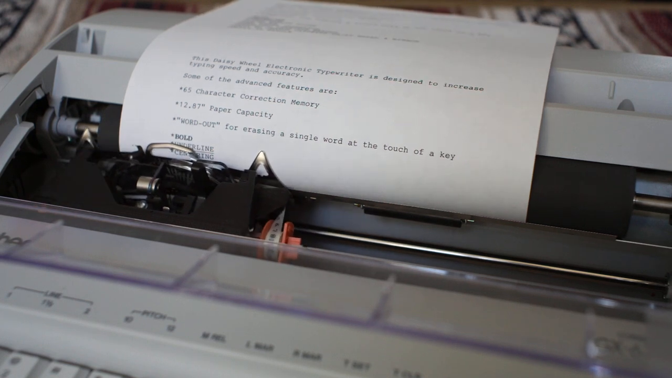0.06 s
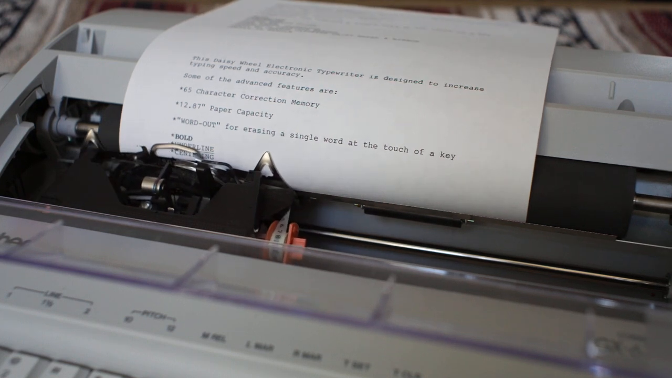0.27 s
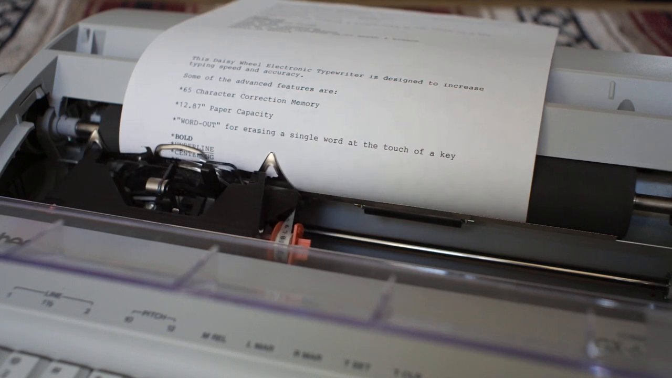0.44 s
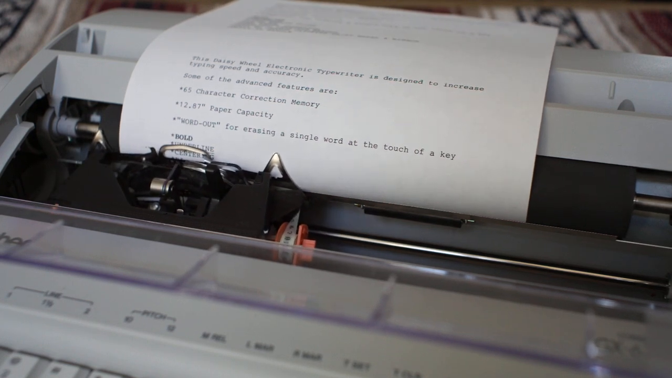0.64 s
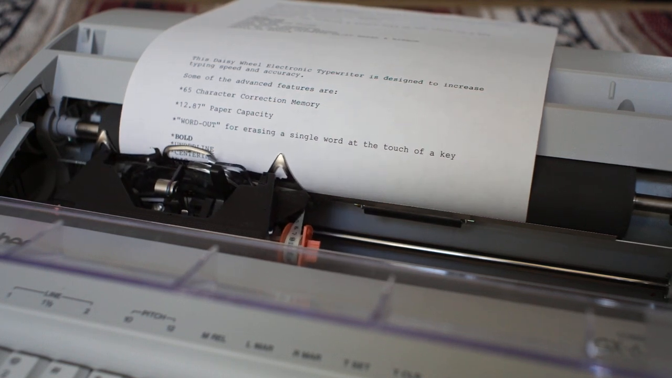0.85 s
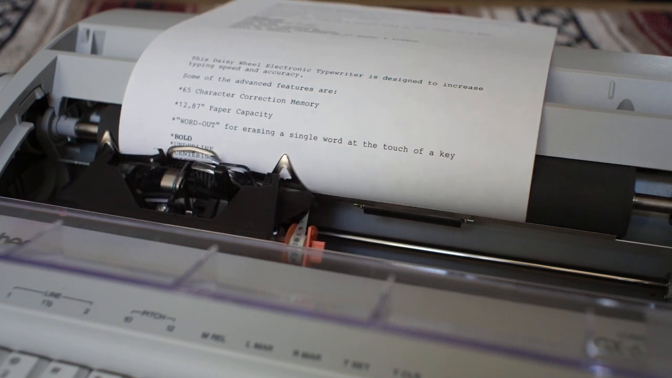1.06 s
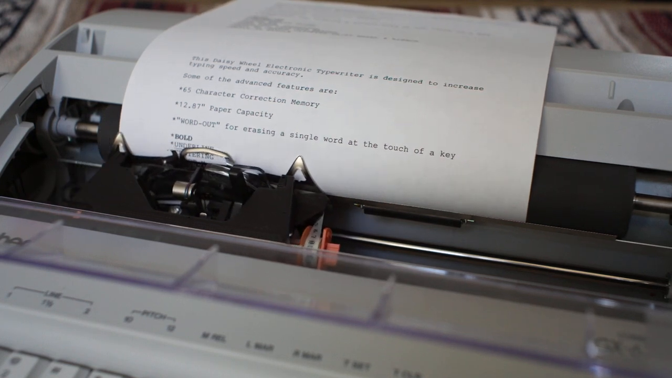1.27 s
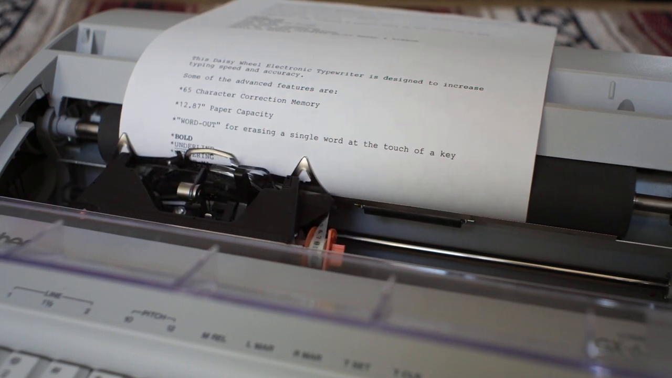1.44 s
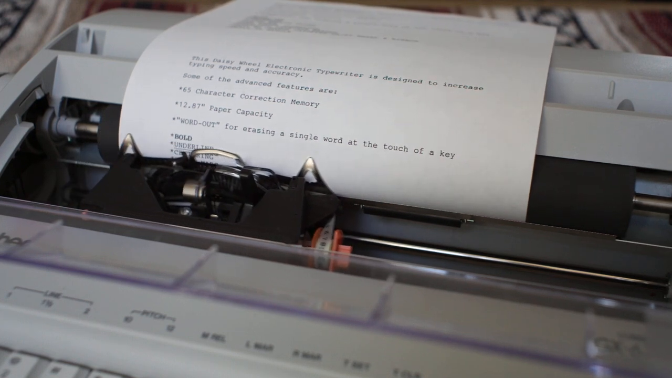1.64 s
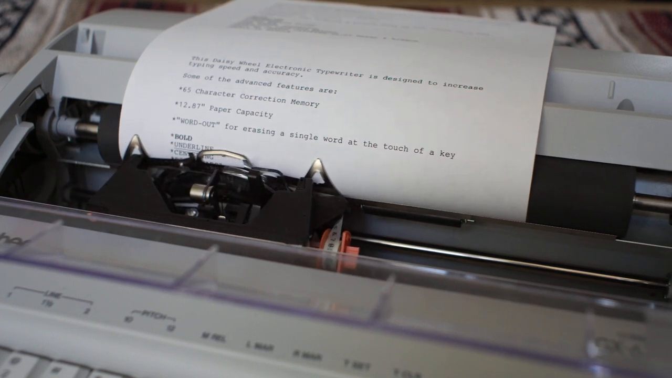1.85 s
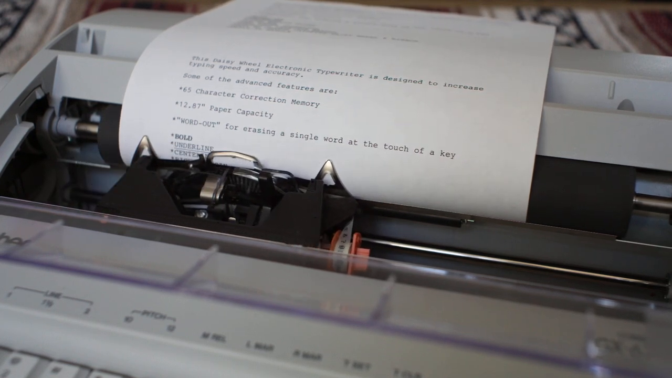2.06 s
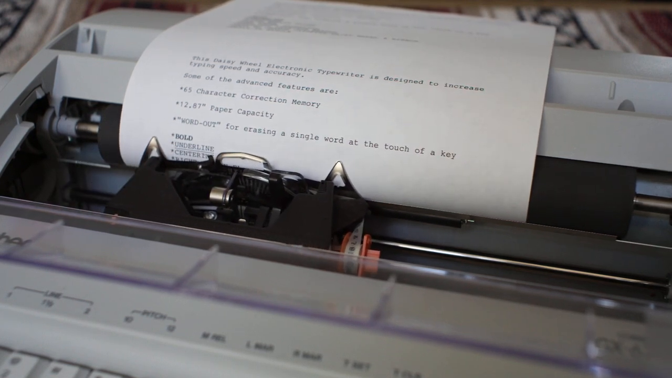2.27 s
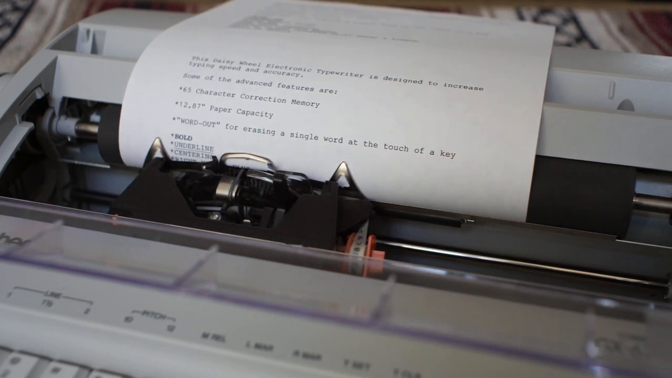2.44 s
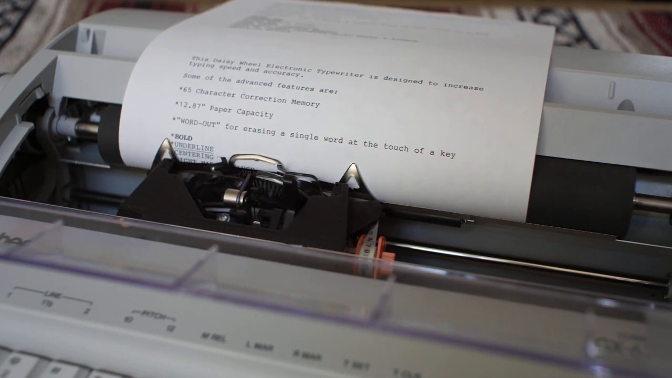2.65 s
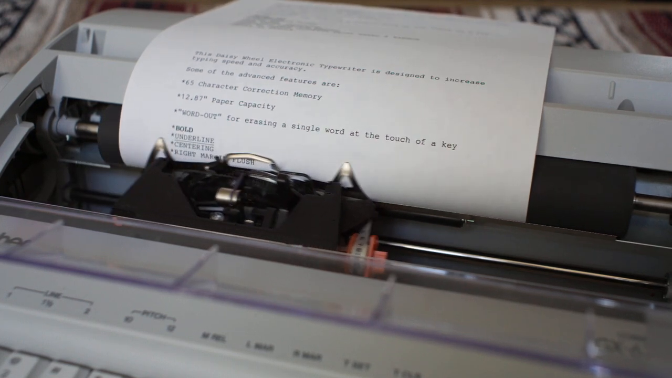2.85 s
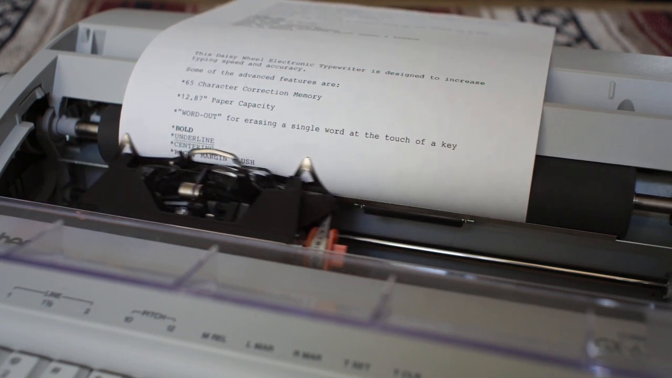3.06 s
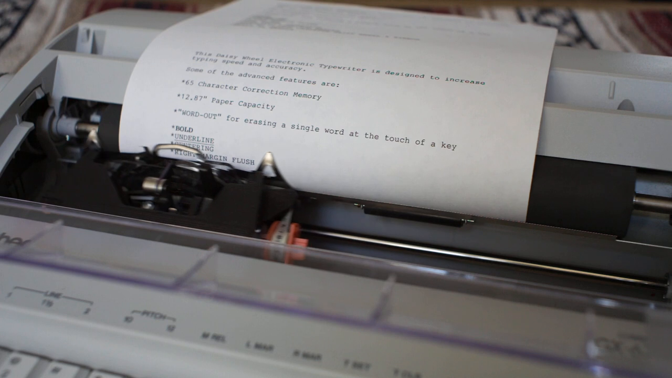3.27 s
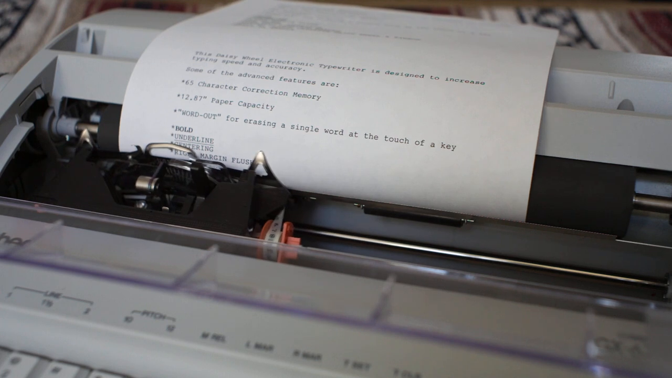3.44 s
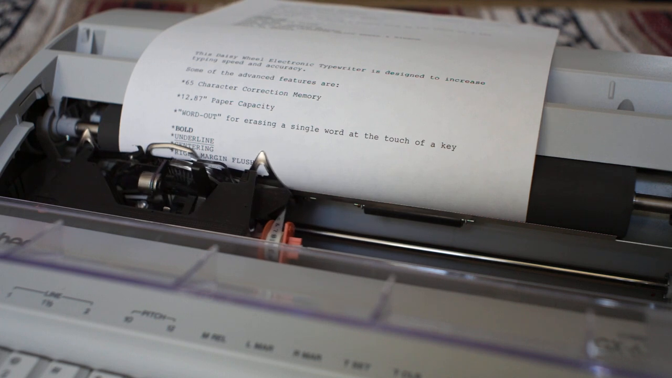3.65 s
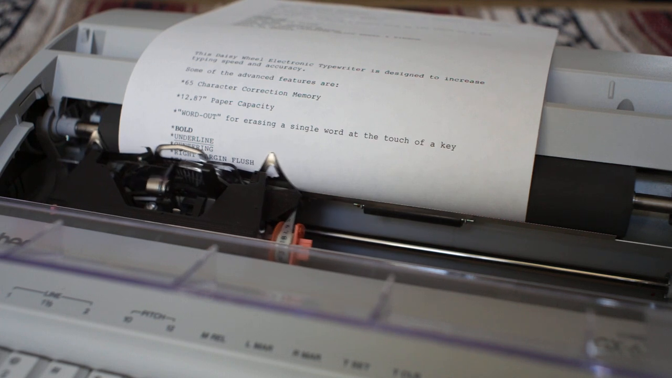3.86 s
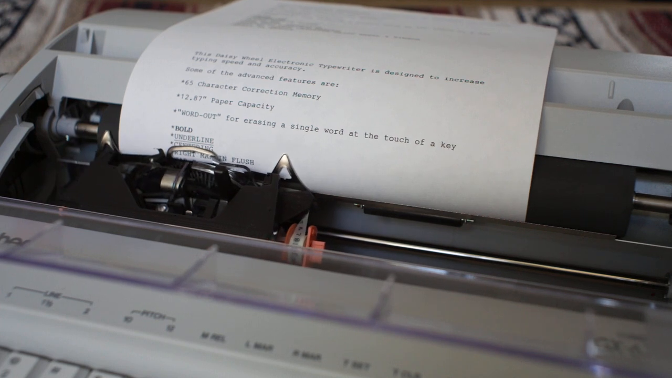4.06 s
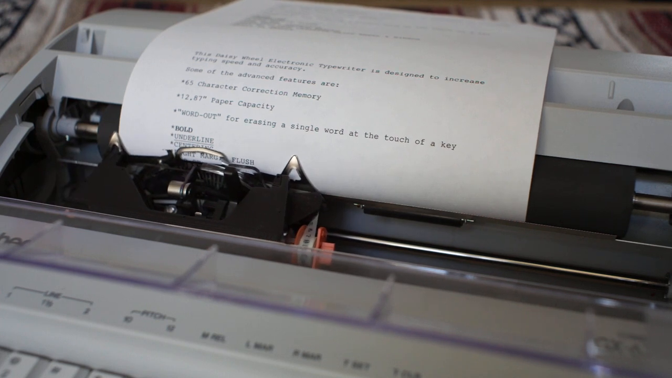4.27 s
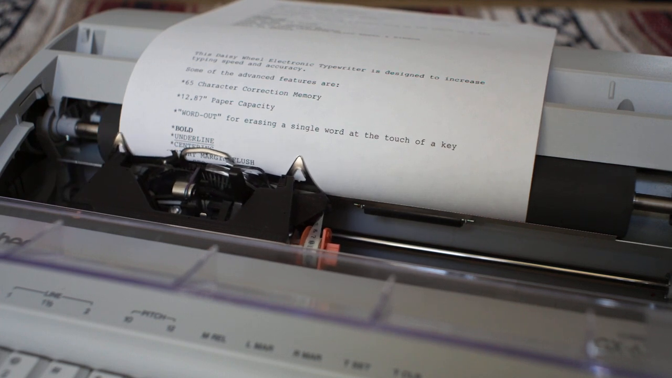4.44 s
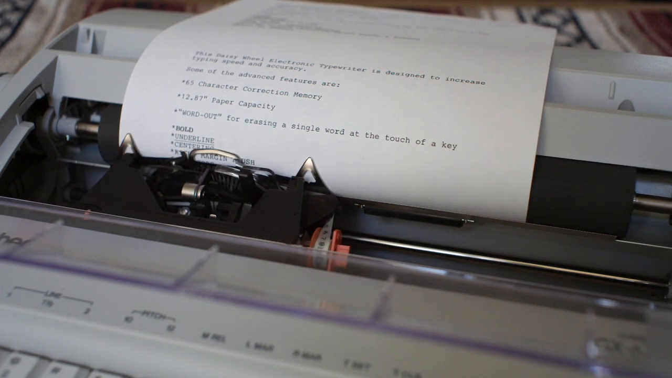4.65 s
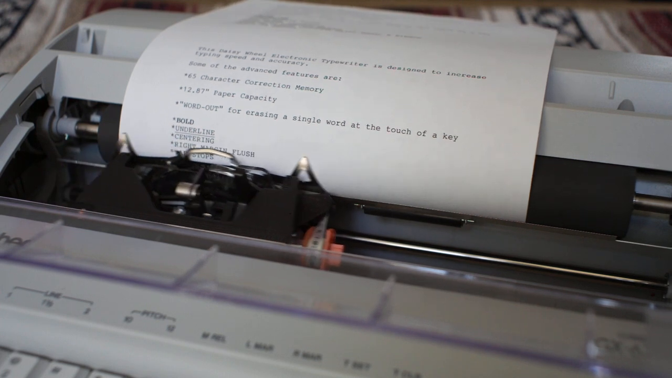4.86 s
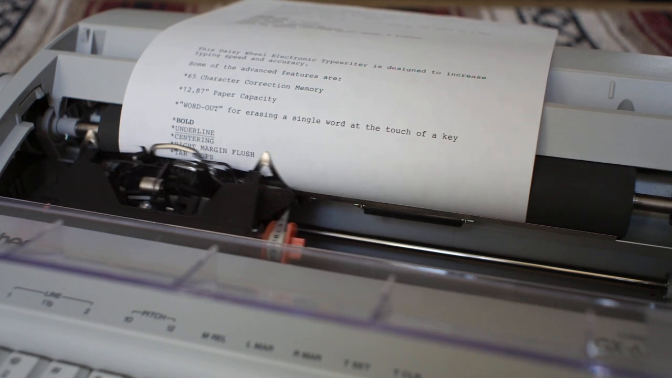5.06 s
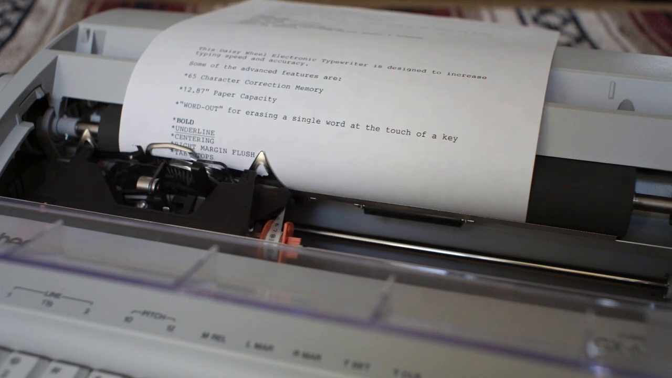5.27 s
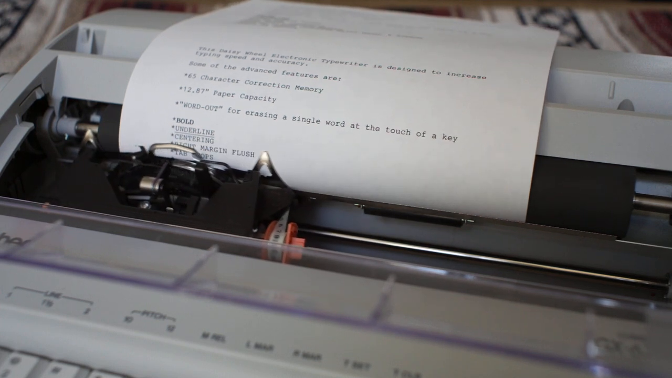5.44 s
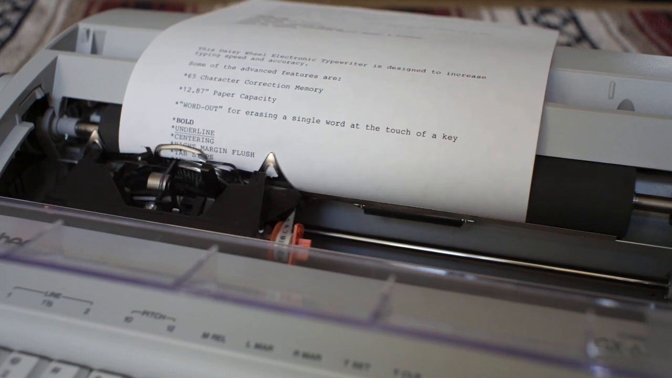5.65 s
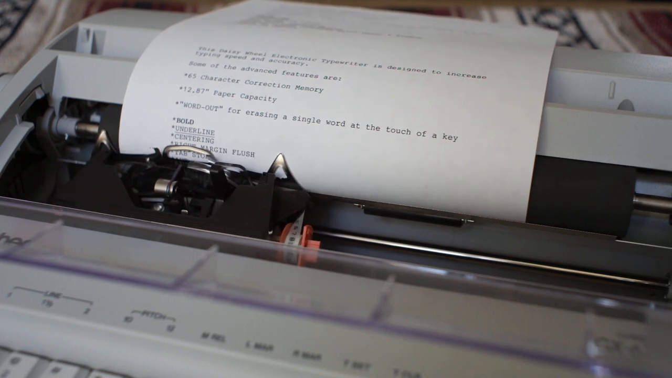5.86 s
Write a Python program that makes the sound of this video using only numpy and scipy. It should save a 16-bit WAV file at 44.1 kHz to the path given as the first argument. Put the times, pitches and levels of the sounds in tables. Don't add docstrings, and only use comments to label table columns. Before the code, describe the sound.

Close, dry machine-gun-like typing from a daisy wheel typewriter: a long run, a humming carriage return, a shorter run, another hum, four final clacks.

```python
import sys
import numpy as np
from scipy import signal
from scipy.fft import rfft, irfft
from scipy.io import wavfile
from scipy.ndimage import uniform_filter1d, map_coordinates

SR = 44100
rng = np.random.default_rng(int(sys.argv[2]) if len(sys.argv) > 2 else 0)


def wav_record(signal):
    frames = np.transpose(np.atleast_2d(signal))
    bounded = np.clip(frames, -1, 1)
    quanta = np.round(bounded * 32767).astype(np.int16)
    wavfile.write(sys.argv[1], SR, quanta)


def voltage_ratio(decibels):
    exponent = np.asarray(decibels, float) / 20
    return 10 ** exponent


N = 260631

# blow [t/s], blow [level/dB], rebound [level/dB], brightness re blow [level/dB]
LETTERS = [(0.2685, -32.5, -35.5, -5), (0.4477, -29, -35.5, -4.5), (0.656, -32.5, -38, -4.5),
           (0.8431, -29.5, -36.5, -5.5), (1.017, -31, -36, -6.5), (1.1382, -29, -35, -7),
           (1.2874, -30.5, -37, -7.5), (1.443, -28.5, -35.5, -7), (1.5981, -30, -37, -6),
           (1.7032, -29.5, -34.5, -5), (1.8893, -30.5, -34.5, -8.5), (1.989, -30, -35.5, -5),
           (2.1555, -31, -37, -6.5), (2.271, -29.5, -37, -5), (2.3948, -30, -34.5, -7),
           (2.515, -29, -35.5, -5), (2.6262, -31.5, -35, -6), (3.7142, -30, -34.5, -4.5),
           (3.8136, -31, -35.5, -5), (3.913, -30.5, -36, -4.5), (4.0117, -32, -34.5, -5.5),
           (4.1405, -29, -34.5, -7.5), (4.239, -32, -36, -7), (4.383, -29.5, -34.5, -6),
           (4.537, -29.5, -35, -9), (4.637, -29.5, -35, -5.5), (5.4824, -33, -34, -5),
           (5.587, -29.5, -36.5, -5.5), (5.718, -32, -35, -4), (5.8463, -28.5, -37, -7)]
# near 700 Hz, 1.8 kHz, 3.6 kHz [level/dB each]
LETTER_TINTS = [(-1.5, 0.5, -0.5), (-2, -2.5, 0.0), (0, 0.5, 0.0), (1.5, -2.5, 1.0), (0, -1.5, 1),
                (-2.5, 0.5, -0.5), (0.5, 0.5, 1), (-1, 0.0, 0.5), (2.5, 1, -1.5), (-1.5, 1.5, 0.5),
                (2, -1.5, 0.5), (-1, -0.5, 0.5), (2.5, -0.5, 2), (-0.5, 0.0, 1), (0.5, -2.5, 1), (0.5, 0, -1),
                (-0.5, 0, 0.5), (-1.5, -0.5, 0), (-1.5, -1, -0.5), (-0.5, -1, 1), (-0.5, -1, 0), (-2.5, 0, 0),
                (-0.5, -1.5, 2.5), (-3, 1.5, 0.5), (1, -2, 1), (-2, 0, 0.5), (-1.5, 1, -2), (-2, -1, -0.5),
                (-1.5, -0.5, 0.5), (-3.0, 0.5, 0)]
# low edge [f/Hz], high edge [f/Hz]
TINT_BANDS_HZ = [(450, 1100), (1300, 2600), (2600, 5000)]

# time re blow (PULL: re pull) [t/ms], [level/dB], rise [t/ms], t60 [t/ms]
PULL = [
    (0, 1, 0.65, 23.7),
    (2.5, -3, 3.5, 33),
]
TICKS = [
    (-25, -11.5, .4, 27),
    (-19.3, -15.5, 1, 26),
    (-11.6, -12.5, .3, 16),
]
TRAVEL = [
    (-23.5, -24, 1.5, 26),
    (-18.5, -23, 1, 25),
    (-10.5, -22, 1, 30),
]
TEETH = [
    (-46.5, -32, 0.88, 40),
    (18.5, -25, .6, 16),
    (24.5, -23.5, 0.54, 17),
    (29.5, -30, .6, 11),
    (35.5, -22.5, 0.94, 16),
    (42.5, -27, .6, 18),
    (57, -26.5, .6, 19),
]
BLOW = [
    (0.1, -3, 0.24, 13),
    (0.1, 4.5, 0.92, 15.9),
    (3.99, -8, 1, 13),
]
REBOUND = [
    (6.5, 2.5, 0.35, 20.4),
    (8.2, 0.5, 0.64, 18.4),
    (12, -2, 0.91, 7.6),
    (16.5, -46, 1.1, 33),
]
STOP = [
    (55.6, -25.5, 3.9, 43),
    (64.2, -30.5, 2.8, 60),
]
# time re blow [t/ms], [level/dB], the same for every letter
STEP = [(8, -53.5), (14, -18.5), (22, -22.5), (30, -27.5), (45, -28.5), (60, -32.5), (70, -37.5), (78, -40),
        (110, -61)]

# [f/Hz], [level/dB]
PULL_TONE = [(88, -66), (150, -24.5), (960, -2.5), (1420, -3), (2060, 1), (2600, -8.5), (3350, 1.5),
             (4670, -6.5), (6510, -2), (7320, -8.5), (8400, -3.5), (11300, -7), (13400, -22), (16000, -26)]
TICK_TONE = [(180, -46), (400, -7.5), (1100, -10), (2100, -4), (3500, -8), (4400, -1.5), (6500, -7),
             (8000, -3), (9300, -1.5), (12000, -7.5), (13500, -16), (15200, -14), (16000, -25)]
BLOW_TONE = [(88, -38.5), (150, -22.5), (783, -12), (1310, -15), (1820, -8), (2350, 0.5), (2810, -1),
             (5170, -7.5), (5700, -10), (6550, -10.5), (7220, -18.5), (9510, -9.5), (11600, -17),
             (15000, -36.5), (16500, -67)]
REBOUND_TONE = [(88, -42), (150, -23), (1070, -2.5), (1590, 0.5), (2350, -2.5), (2920, -1.5), (4600, -4.5),
                (5590, -5.5), (6550, -7.5), (8290, -3.5), (8970, 3), (11600, -6), (13600, -17.5),
                (15300, -16.5), (16500, -42)]
STEP_TONE = [(59, -37.5), (100, -4.5), (153, -9), (676, -3), (836, -2), (1280, -6), (1650, -4.5),
             (1800, -6), (2520, -6.5), (3400, -9), (4570, -8), (6020, -12), (9210, -12), (11400, -46),
             (16000, -54)]
CLUNK_TONE = [(59, -29), (100, 0.5), (1170, 5), (1950, -5.5), (2320, -0.5), (2630, -6.5), (3540, -16),
              (4200, -25), (4870, -14), (7450, -17.5), (9020, -29), (9820, -61), (16000, -43)]
LATCH_TONE = [(900, -25), (2100, -5.5), (2500, -6), (3200, -1), (3800, -11.5), (5000, -13), (7000, -26)]
SNAP_TONE = [(400, 5), (2100, -16), (4400, -4), (9300, 0), (11500, -5.5), (13000, -12), (16000, -34)]
# [f/Hz], [level/dB]
DRIVE_TONE = [(200, -3), (600, 5.5), (1400, -11), (2500, -0.5), (3300, -20), (6500, -33), (8100, -8),
              (9000, -13), (14000, -20)]
WHIRR_TONE = [(400, -26), (1100, -6), (1500, 0), (2300, -8), (3500, -9.5), (9000, -38.5)]
WHEEL_HISS_TONE = [(2000, -30), (4500, 0), (8000, -2), (12000, -8), (16000, -20)]
# [f/Hz], [level/dB]
LOW_FLOOR = [(12, -43), (20, -14.5), (38, -19), (54, -8), (70, -9), (108, -11.5), (142, -27), (185, -13.5),
             (240, -13.5), (299, -12), (436, -8.5), (710, -9.5), (1010, -11), (1180, -12), (1680, -12),
             (1840, -13), (2010, -17), (2460, -19), (2630, -20), (4000, -28), (5200, -58), (8800, -120)]
HIGH_FLOOR = [(1500, -31.5), (3000, -2), (4700, -4), (6500, 3), (8000, -12), (9500, -13), (12000, -17),
              (16000, -28)]
# idle [level/dB], added by a letter [level/dB], rise [t/s], t60 [t/s]
LOW_STIR = (-73.5, -62.5, 0.15, 1.5)
HIGH_STIR = (-91, -68, -8.5, 4.5)

# [f/Hz], width [f/Hz], [level/dB]
FRAME = [(814, 440, 0.5), (1180, 110, 0), (1617, 176, 6), (1837, 126, 6.5), (2128, 88, 5.5),
         (2322, 300, 5.5), (2804, 210, 2.5), (3360, 98, 0), (3860, 145, 2), (4510, 110, 2),
         (6670, 380, 3.5), (7300, 270, -3), (9850, 850, -2.5)]
# [f/Hz], [level/dB], t60 [t/s], start re blow [t/ms]
CASE = [(63.1, -50.5, 0.29, 4), (88, -33, 0.1, 6), (74, -46.5, 0.23, 54.5), (180.4, -44, 0.29, 14),
        (299.3, -27.5, 0.07, 3.5), (343.2, -42, 0.27, -1), (436, -31.5, 0.061, 3.5), (556, -22, 0.035, 3.5),
        (858, -12.5, 0.02, 0.56), (1031, -23.5, 0.035, 0)]
# column 0 [f/Hz], [level/dB], column 16 [f/Hz], [level/dB], t60 [t/ms]
SOLENOID = [(1344, -43.5, 1400, -66, 26), (1630, -60, 4000, -71, 25), (1857, -42, 1100, -48, 29.5),
            (2090, -52, 2200, -60, 30), (2450, -59, 2800, -49, 24.4), (2830, -49.5, 2500, -53, 31),
            (3220, -41.5, 3180, -37.5, 21.4), (3660, -54, 3310, -41.5, 22), (4190, -57, 3100, -36.5, 28),
            (5380, -51, 4900, -51, 22), (5600, -68, 5512, -47.5, 22), (6370, -57, 6341, -42.5, 29),
            (6830, -50, 4600, -57, 20)]
HAMMER = [(1496, -37, 1385, -45, 38), (1950, -50, 2020, -39.5, 18), (2340, -34.5, 2227, -41, 15.4),
          (2470, -33.5, 2476, -43, 24), (2890, -29, 2790, -44, 17.2), (3353, -39, 3270, -38.5, 26),
          (3920, -46, 3811, -32.5, 20), (4277, -35.5, 4700, -45, 21.5), (5000, -37, 5300, -39, 16),
          (5050, -37, 4660, -65, 20), (6390, -56, 5600, -25, 8.4)]
RIBBON = [(1480, -58.5, 1200, -55, 20), (2090, -47, 1900, -45.5, 18), (3250, -54, 3800, -53.5, 20),
          (2384, -44.5, 2300, -49.5, 11)]
SWING = [(510, -56, 640, -56, 25), (1170, -47, 930, -51.5, 16), (1580, -48, 1600, -45, 29),
         (2150, -47.5, 2050, -48, 26), (3390, -54.5, 3300, -58, 33), (5800, -56, 6000, -57.5, 39)]
GUIDE = [(9030, -39.5, 8400, -49.5, 10), (9470, -44, 9500, -42, 13), (15000, -56, 14800, -55, 12)]

# start [t/s], stop [t/s], whine at start, halfway, stop [level/dB each]
WHEEL = [
    (.112, 2.8, -74, -74.5, -79),
    (3.6, 4.8, -74, -75, -80),
    (5.385, 5.91, -70.5, -72, -71),
]
# ribbon lift [t/s], halt [t/s], step rate [f/Hz], hum [level/dB], lift [level/dB]
MOVES = [
    (-.6, -0.071, 462, -72, 0),
    (2.904, 3.427, 461, -70, -0.5),
    (4.9138, 5.205, 460, -70, 0),
]
# time re lift or halt [t/ms], dull [level/dB], sharp [level/dB], rise [t/ms], t60 [t/ms]
LIFT = [
    (-6.5, -53.5, -77.5, 4.4, 45),
    (-1.5, -54, -53, 1.3, 42),
    (6, -57.5, -54, 1.2, 37),
    (17, -63.5, -60, 1.1, 75),
]
HALT = [(-14.5, -64, -79, 4, 50), (-3.5, -68, -80, 3.3, 44), (2, -60.5, -73, 0.88, 41),
        (6, -55.5, -83, 1.9, 51), (18.5, -74, -80, 2.2, 35), (64.5, -56, -83, 3.2, 62),
        (75, -56.5, -66, 2.2, 55), (84, -69, -76, 2.2, 41), (94, -65.5, -56, 1.6, 44),
        (105, -56.5, -72, 1.5, 58), (113, -58.5, -78, 2.3, 36)]
# [t/s], dull [level/dB], sharp [level/dB]
KNOCKS = [(0.1208, -74, -90), (0.148, -64.5, -74), (0.325, -55, -80), (2.074, -53, -67), (2.824, -71, -68),
          (3.668, -66, -69.5), (4.872, -67, -72), (5.437, -73, -83), (0.511, -62, -78), (0.714, -61, -76),
          (.723, -57, -76), (.9, -53.5, -78), (.917, -64, -83), (1.083, -53, -76), (1.233, -51, -76),
          (1.509, -56, -76), (1.768, -51, -76), (2.331, -54.5, -78), (2.459, -58, -78), (2.578, -56, -78),
          (4.072, -73, -82), (4.297, -57, -80), (4.458, -65, -80), (4.703, -61, -78), (5.542, -54, -78),
          (5.78, -58, -78)]

# [f/Hz], t60 [t/s]
ROOM = [(100, 0.36), (1000, 0.31), (4000, 0.4), (12000, 0.29)]
# [f/Hz], [level/dB]
SPREAD = [(50, 4), (100, -18.5), (180, -14), (350, -19.5), (800, -12.5), (1300, -22.5), (2500, -31),
          (4000, -17), (5000, -11), (6200, -22), (8000, -34.5), (11000, -35.5), (14000, -9.5), (16500, -15)]
PLACE = [(20, -20), (48, -2), (100, -0.5), (140, -7), (181, 0), (240, -0.5), (320, -0.5), (420, 1),
         (20000, -1)]
OFFSET = [
    [-.00214],
    [.00154],
]

T_S = np.arange(N) / SR
PRE = 2000
ROW_MS = (np.arange(8000) - PRE)[None] / SR * 1000
BLOW_S, BLOW_DB, REBOUND_DB, BRIGHT_DB = np.transpose(LETTERS)
EVEN_DB = np.zeros(len(BLOW_S))
HARD_DB = BLOW_DB - BLOW_DB.mean()
FIRST = np.diff(BLOW_S, prepend=-1) > .5
COLUMN = np.arange(len(FIRST)) - np.maximum.accumulate(FIRST * np.arange(len(FIRST)))
LEAD_MS = 36.2
PULL_LEAD_MS = (LEAD_MS + 0.47 * HARD_DB + 0.724 * FIRST)[:, None]


def unit(x):
    return x / np.sqrt(np.mean(x ** 2) + 1e-20)


def noise():
    return rng.standard_normal(N)


def along(points, hz):
    f, v = np.transpose(points)
    return np.interp(np.log(hz + 1), np.log(f + 1), v)


def wobble(rate_hz):
    knots = rng.standard_normal(int(N * rate_hz / SR) + 4)
    return map_coordinates(knots, [np.arange(N) * rate_hz / SR])


def colour(x, tone, ring=0, size=8192):
    hz = np.fft.rfftfreq(size, 1 / SR)
    bumps_db = sum(db / (1 + (2 * (hz - centre) / width) ** 2) for centre, width, db in FRAME)
    response_db = np.maximum(along(tone, hz), -90) + ring * bumps_db
    fold = np.r_[1, np.full(size // 2 - 1, 2), 1, np.zeros(size // 2 - 1)]
    cepstrum = irfft(np.log(voltage_ratio(response_db))) * fold
    kernel = irfft(np.exp(rfft(cepstrum)))[:size // 2]
    return signal.fftconvolve(x, kernel / np.linalg.norm(kernel))[:N]


def burst(t, db, rise, t60):
    t = np.maximum(t, 0)
    return voltage_ratio(db - 60 * t / t60) * (1 - np.exp(-t / rise))


def gate(start_s, stop_s, ramp):
    return uniform_filter1d((T_S > start_s) * (T_S < stop_s) * 1., ramp)


def lay(rows):
    at = np.round(BLOW_S[:, None] * SR).astype(int) + np.arange(rows.shape[1]) - PRE
    return np.bincount(at.ravel(), rows.ravel(), N + SR)[:N]


def chain(contacts, scatter_ms, scatter_db, shift_ms=0):
    chance = rng.standard_normal((len(LETTERS), len(contacts), 2))
    total = 0
    for k, (at, db, rise, t60) in enumerate(contacts):
        ms = ROW_MS + shift_ms - at - scatter_ms * chance[:, k, :1]
        total = total + burst(ms, db + scatter_db * chance[:, k, 1:], rise, t60)
    return total


def cycle(envelope, db, alike):
    common = rng.standard_normal(envelope.shape[1])
    own = rng.standard_normal(envelope.shape)
    push = rfft(envelope * (np.sqrt(alike) * common + np.sqrt(1 - alike) * own))
    power = np.abs(uniform_filter1d(np.abs(push) ** 2, 40)) + 1e-20
    push = push * (power.mean(axis=1)[:, None] / power) ** .22
    return lay(irfft(push) * voltage_ratio(db)[:, None])


def rings(modes, start_ms, db, rise_ms):
    skip = PRE - 100 + int(np.min(start_ms) * SR / 1000)
    t_ms = (np.arange(1400)[None] + skip - PRE) / SR * 1000 - start_ms
    way = COLUMN[:, None] / 16
    chance = rng.standard_normal((len(LETTERS), len(modes), 3))
    phase = rng.uniform(0, 2 * np.pi, len(modes))
    rows = 0
    for k, (hz_0, db_0, hz_16, db_16, t60) in enumerate(modes):
        hz = (hz_0 + (hz_16 - hz_0) * way) * (1 + .012 * chance[:, k, 1:2])
        mode_db = db_0 + (db_16 - db_0) * way + 1.8 * chance[:, k, :1]
        tone = np.sin(2 * np.pi * hz * t_ms / 1000 + phase[k] + .5 * chance[:, k, 2:])
        rows = rows + burst(t_ms, mode_db, rise_ms, t60) * tone
    return lay(np.pad(rows * voltage_ratio(db)[:, None], ((0, 0), (skip, 0))))


def room(x, scale, size=4096):
    pieces = np.pad(x, (0, -N % size)).reshape(-1, size)
    hz, t, z = signal.stft(rng.standard_normal((len(pieces), SR // 3)), SR, nperseg=256)
    decay = voltage_ratio(-60 * t / (scale * along(ROOM, hz)[:, None]))
    tails = signal.istft(z * decay, SR, nperseg=256)[1]
    tails = tails / np.linalg.norm(tails, axis=1)[:, None]
    wet = signal.fftconvolve(pieces, tails, axes=1)
    at = np.arange(len(wet))[:, None] * size + np.arange(wet.shape[1])
    return np.bincount(at.ravel(), wet.ravel())[:N]


def stirred(idle_db, letter_db, rise_s, t60_s):
    t = np.maximum(np.arange(0, N, 64) / SR - BLOW_S[:, None] + LEAD_MS / 1000, 0)
    power = voltage_ratio(2 * idle_db) + np.sum(burst(t, letter_db, abs(rise_s), t60_s) ** 2, axis=0)
    return np.interp(np.arange(N) / 64, np.arange(len(power)), np.sqrt(power))


def floor():
    low = unit(colour(noise(), LOW_FLOOR)) * stirred(*LOW_STIR)
    high = unit(colour(noise(), HIGH_FLOOR)) * stirred(*HIGH_STIR)
    return low * voltage_ratio(-3.5 + 1.6 * wobble(6.9)) + high * voltage_ratio(-1.5 + wobble(6.2))


def carriage_motor():
    out = np.zeros(N)
    grind = voltage_ratio(-10.5 + 2.3 * wobble(28)) * colour(noise(), DRIVE_TONE)
    for start, stop, hz, db, _ in MOVES[1:]:
        under_way = start + 0.0052
        step_hz = hz - 12 * np.exp(-np.abs(T_S - start) / .025) + 1.5 * wobble(25) + 11 * wobble(140)
        phase = 2 * np.pi * np.cumsum(step_hz) / SR
        tone = np.sin(phase)
        for harmonic, harmonic_db in ((2, -20.5), (3, -24.0), (4, -21.0)):
            tone = tone + voltage_ratio(harmonic_db) * np.sin(harmonic * phase)
        tone = tone * (1 - np.exp(-np.maximum(T_S - under_way, 0) / 0.0051))
        swell = voltage_ratio(2.6 * wobble(40) + .6 * wobble(9) - 2.2)
        out += gate(under_way, stop - .004, 500) * voltage_ratio(db) * (swell * tone + grind)
    return out


def wheel_motor():
    out = np.zeros(N)
    whine_hz, start_hz = 893, 760
    hiss = voltage_ratio(1.5 * wobble(40)) * colour(noise(), WHEEL_HISS_TONE)
    whirr = voltage_ratio(-6.5 + 2.1 * wobble(45)) * colour(noise(), WHIRR_TONE)
    drift_hz = 7 * wobble(20) + 22 * wobble(250)
    beads = voltage_ratio(3.2 * wobble(60))
    for start, stop, *db in WHEEL:
        ends = np.exp(-np.abs(T_S - start) / .055) + np.exp(-np.abs(T_S - stop) / .08)
        phase = 2 * np.pi * np.cumsum(whine_hz + (start_hz - whine_hz) * ends + drift_hz) / SR
        tone = beads * (np.sin(phase) + voltage_ratio(-13) * np.sin(2 * phase))
        level_db = np.interp(T_S, [start, (start + stop) / 2, stop], db) + 2.5
        out += gate(start, stop + .07, 3000) * voltage_ratio(-83) * hiss
        out += gate(start, stop, 300) * voltage_ratio(level_db) * (tone + whirr)
    return out


def clunks():
    dull, sharp = np.zeros((2, N + 2 * SR))
    ms = np.arange(SR // 5) / SR * 1000
    contacts = [(s, dull_db, sharp_db, 1.4, 37) for s, dull_db, sharp_db in KNOCKS]
    for lift, halt, _, _, lift_db in MOVES:
        for at, dull_db, sharp_db, rise, t60 in LIFT:
            contacts.append((lift + at / 1000, dull_db + lift_db, sharp_db + 3 * lift_db, rise, t60))
        for at, *rest in HALT:
            contacts.append((halt + at / 1000, *rest))
    for s, dull_db, sharp_db, rise, t60 in contacts:
        span = slice(round(s * SR) + SR, round(s * SR) + SR + len(ms))
        dull[span] += burst(ms, dull_db + 2.5, rise, t60)
        sharp[span] += burst(ms, sharp_db + 3.5, 0.99 * rise, 0.55 * t60)
    dull, sharp = dull[SR:][:N], sharp[SR:][:N]
    lumps = noise() * voltage_ratio(3.0 * wobble(400))
    grit = noise() * voltage_ratio(1.9 * wobble(500))
    boom_tone = [(60, -36), (95, -14.0), (150, -44), (181, 0), (215, -8), (300, -5.5), (400, -59.5)]
    body = colour(dull * lumps, CLUNK_TONE, ring=0.5)
    snap = colour(sharp * grit, SNAP_TONE, ring=0.22)
    boom = colour((sharp + 0.24 * dull) * lumps, boom_tone)
    latch = colour(dull * grit, LATCH_TONE, ring=0.91)
    return body + snap + voltage_ratio(-6.0) * boom + voltage_ratio(-4) * latch


def case_ring():
    detune = 1 + .022 * rng.standard_normal((len(LETTERS), 1))
    rows = 0
    for hz, db, t60_s, at in CASE:
        loss_db = (hz > 700) * 13 * (COLUMN / 16) ** 3
        mode_db = db + (rng.normal(0, 0.58, len(LETTERS)) - loss_db)[:, None]
        tone = np.sin(2 * np.pi * hz * detune * (ROW_MS - at) / 1000)
        rows = rows + burst(ROW_MS - at, mode_db, 400 / hz + 0.77, 1000 * t60_s) * tone
    return voltage_ratio(-20.0) * lay(rows)


def carriage_step():
    envelope = voltage_ratio(np.interp(ROW_MS, *np.transpose(STEP), -200, -200))
    step = cycle(np.repeat(envelope, len(LETTERS), axis=0), EVEN_DB - 30.5, alike=0.26)
    teeth = cycle(chain(TEETH, 0.45, 2.2), EVEN_DB - 30.5, alike=0.58)
    stop = cycle(chain(STOP, 1.9, 2.7), EVEN_DB - 27.5, alike=0.092)
    rattle = voltage_ratio(2.16 * wobble(150) + 2.4 * wobble(40))
    gear = colour(step * rattle + voltage_ratio(-1.0) * teeth, STEP_TONE, ring=0.3)
    tooth_ticks = voltage_ratio(-12.5) * colour(teeth, TICK_TONE, ring=0.4)
    return gear + tooth_ticks + colour(stop, CLUNK_TONE, ring=0.3)


def solenoid():
    pull = cycle(chain(PULL, .3, .8, PULL_LEAD_MS), EVEN_DB - 41, alike=.5)
    travel = cycle(chain(TRAVEL, 0.223, 0.72), EVEN_DB - 27.5, alike=0.08)
    return colour(pull + travel, PULL_TONE, ring=0.67) + rings(SOLENOID, -PULL_LEAD_MS, EVEN_DB, 0.9)


def ribbon_and_petals():
    ticks = cycle(chain(TICKS, .25, 1.2), EVEN_DB - 30, alike=.3)
    arm = rings(RIBBON, -24, EVEN_DB, 1.3)
    guide = rings(GUIDE, -25.2, EVEN_DB, 0.33)
    return colour(ticks, TICK_TONE, ring=0.69) + arm + guide


def hammer():
    blow = cycle(chain(BLOW, .05, .7), BLOW_DB, alike=.35)
    rebound = cycle(chain(REBOUND, .3, 1.2), REBOUND_DB, alike=.4)
    high = signal.sosfilt(signal.butter(2, 5500, "high", fs=SR, output="sos"), blow)
    sharp = voltage_ratio(np.interp(T_S, BLOW_S, BRIGHT_DB + 13.5))
    blow = blow + (sharp - 1) * high
    struck = colour(blow, BLOW_TONE, ring=1.04) + colour(rebound, REBOUND_TONE, ring=0.81)
    return struck + rings(SWING, -6.3, EVEN_DB, 1.0) + rings(HAMMER, -0.21, HARD_DB, 0.74)


def letter_tint(x):
    knots_s = BLOW_S[:, None] + [-.006, -.003, .017, .025]
    for edges_hz, db in zip(TINT_BANDS_HZ, np.transpose(LETTER_TINTS)):
        knots_db = db[:, None] * [0, 1, 1, 0]
        gain = voltage_ratio(np.interp(T_S, knots_s.ravel(), knots_db.ravel()))
        band = signal.butter(1, edges_hz, "band", fs=SR, output="sos")
        x = x + (gain - 1) * signal.sosfiltfilt(band, x)
    return x


def letters():
    return letter_tint(case_ring() + carriage_step() + solenoid() + ribbon_and_petals() + hammer())


def scene():
    dry = clunks() + carriage_motor() + wheel_motor() + letters()
    echo_s = .022
    send = np.roll(colour(dry, [(6000, 0.1), (9500, -1.0), (12000, -3)]), round(echo_s * SR))
    mid = colour(floor() + dry + voltage_ratio(-22.0) * room(send, 0.9), PLACE)
    tail_tone = [(100, -4), (800, 1.5), (2500, 0.0), (6000, -3.5), (9000, -10), (12000, -19)]
    near = colour(room(mid, 0.063, size=16384), SPREAD)
    tail = colour(room(send, 0.8, size=16384), tail_tone)
    side = voltage_ratio(-20.0) * near + voltage_ratio(-36.5) * tail
    return np.array([voltage_ratio(-1.18) * mid + side, voltage_ratio(-0.92) * mid - side])


def roll_off(x):
    return signal.sosfilt(signal.butter(12, 16810, fs=SR, output="sos"), x)


def record(dry):
    hiss_tone = [(20, 12.0), (40, 12), (60, 22), (100, 6), (140, -8), (200, -2.0), (1000, 10.0),
                 (15600, 4), (15900, -37.0)]
    hiss = np.array([colour(noise(), hiss_tone) for _ in dry])
    band_limit = signal.butter(12, 16350, fs=SR, output="sos")
    mix = signal.sosfiltfilt(band_limit, dry + voltage_ratio(-83) * hiss) + OFFSET
    return roll_off(mix)


dry = scene()
out = record(dry)
wav_record(out)
```